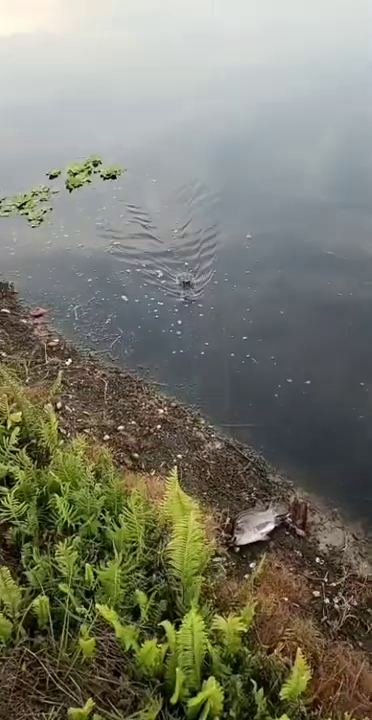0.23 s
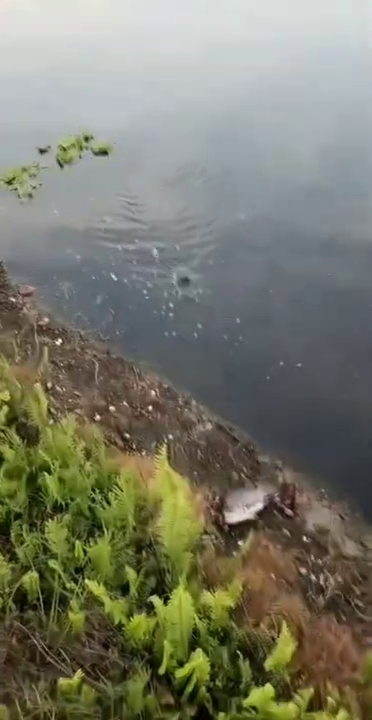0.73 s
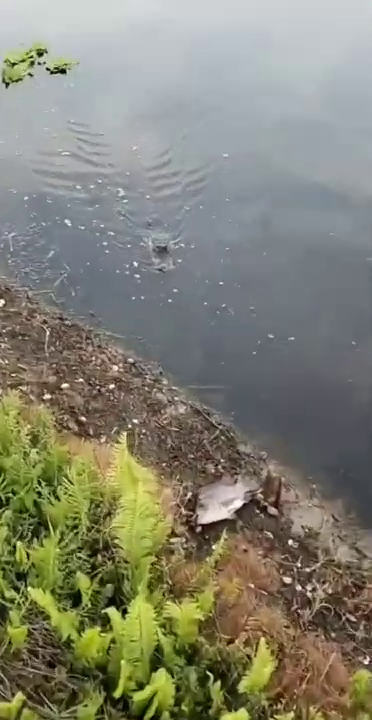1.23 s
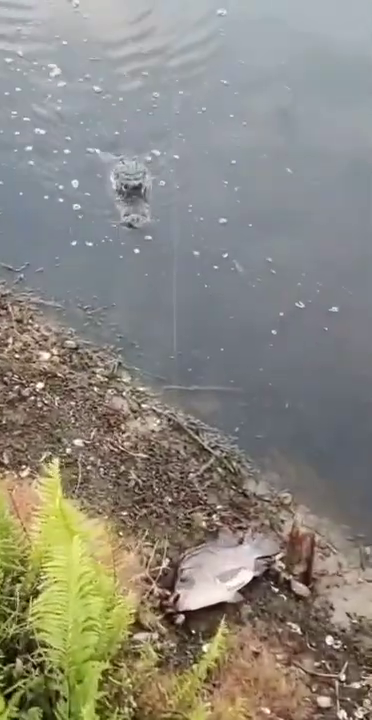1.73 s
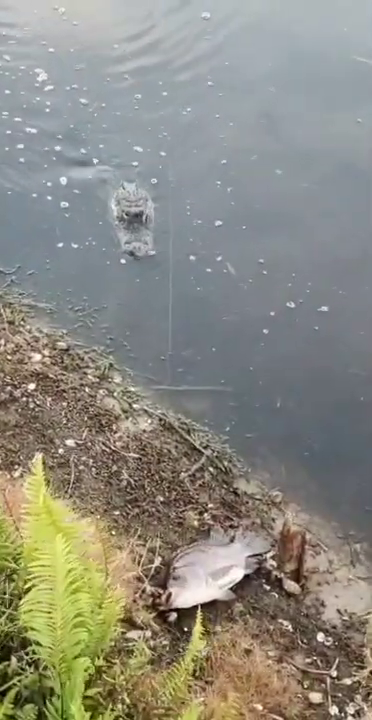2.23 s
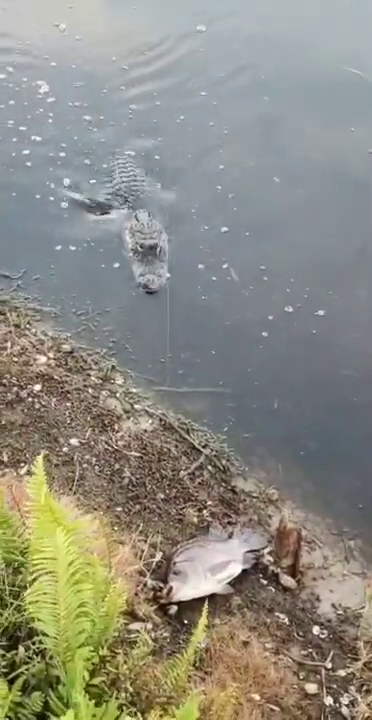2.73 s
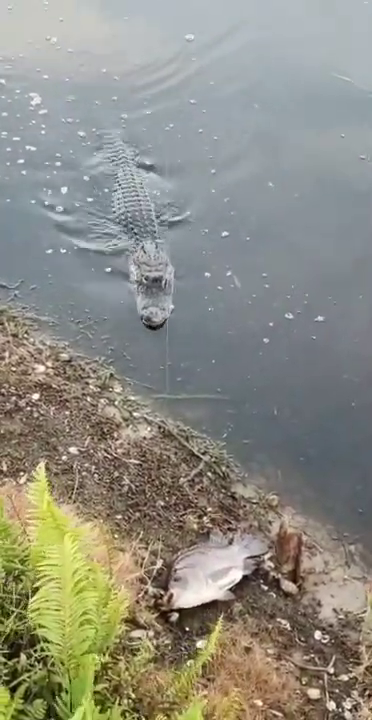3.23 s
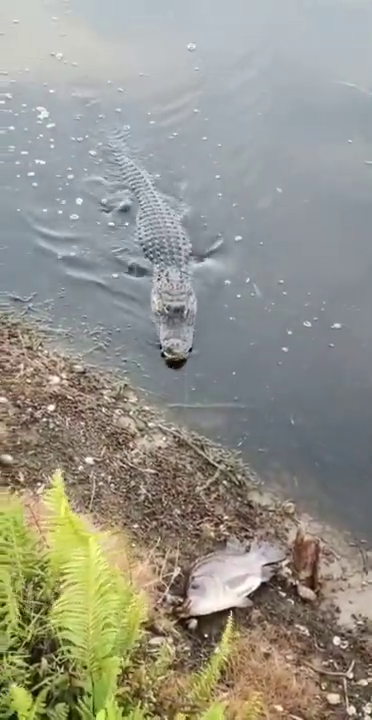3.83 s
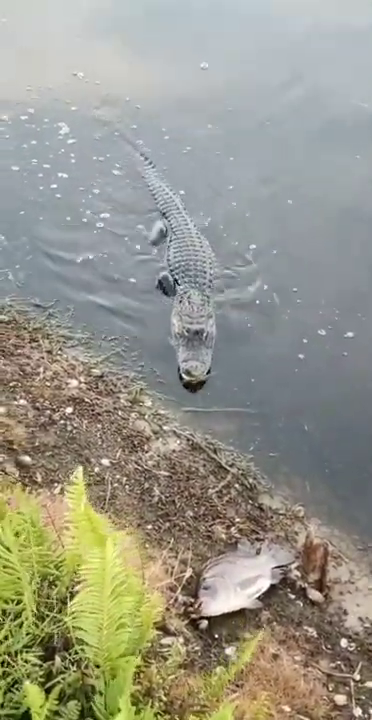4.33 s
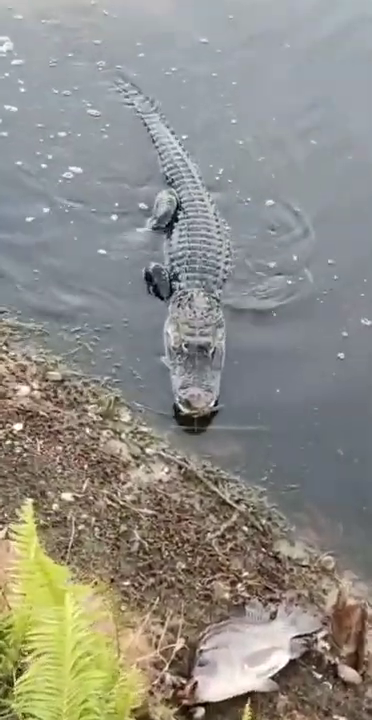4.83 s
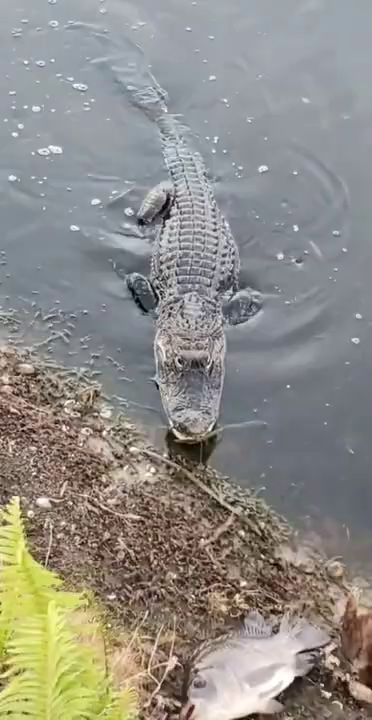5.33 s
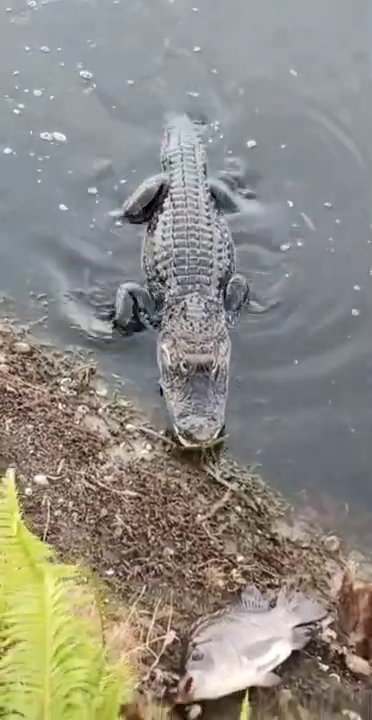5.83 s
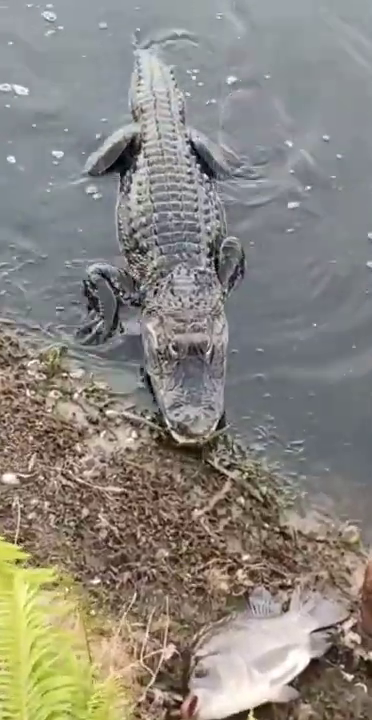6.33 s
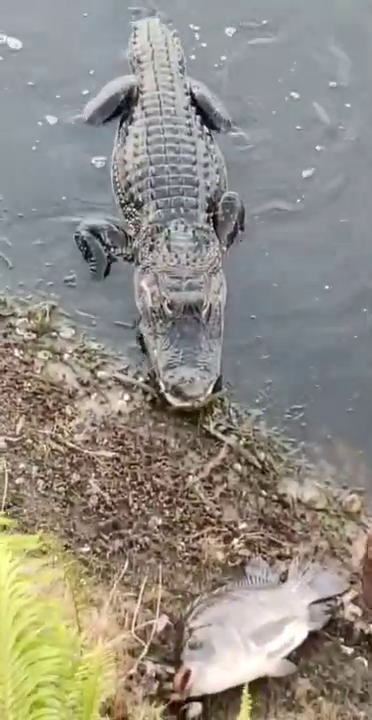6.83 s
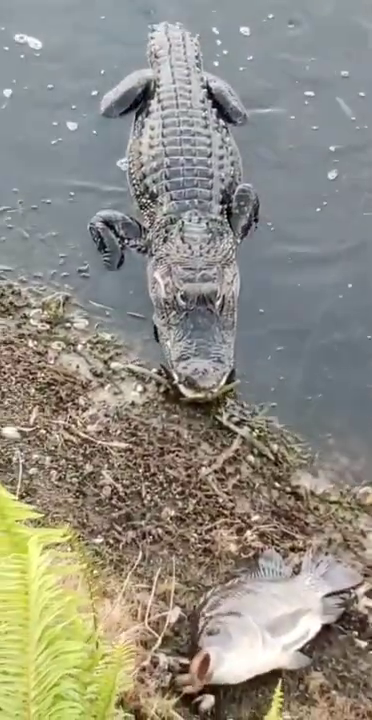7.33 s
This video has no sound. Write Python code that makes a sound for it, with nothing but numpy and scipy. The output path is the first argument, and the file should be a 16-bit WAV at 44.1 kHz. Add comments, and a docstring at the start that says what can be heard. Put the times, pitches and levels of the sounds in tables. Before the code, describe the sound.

Low, lumpy wind thumps on a bare microphone outdoors, hardest near four seconds, over faint high insect ticking, cicada shimmer and distant traffic.

```python
"""Wind, insects and far traffic

On a breezy day turbulent wind thumps low and lumpily on a bare microphone: shaken bands of noise and single eddies.
A stem cracks twice close by. Insects are clicks or pulsed noise ringing in resonances: two swelling cicadas, the
first ringing in other resonances in its second swell, a rattling buzzer and a ticking katydid over a steady chorus
of shaped noise. Crickets and birds are gliding sines. Far traffic is filtered noise with a band of tyre roar.
"""
import sys
import numpy as np
from scipy import signal
from scipy.fft import rfft, irfft, next_fast_len
from scipy.io import wavfile

SR = 44100
rng = np.random.default_rng(int(sys.argv[2]) if len(sys.argv) > 2 else 0)


def file_out(sig):
    """Save sig as 16-bit WAV at sys.argv[1]."""
    # one column per channel
    cols = np.atleast_2d(sig).T
    # limit, then scale
    lim = np.clip(cols, -1, 1)
    pcm = np.round(lim * 32767).astype(np.int16)
    wavfile.write(sys.argv[1], SR, pcm)


N = 333837


def from_db(db):
    """Amplitude gain from a level: 20 dB for each factor of ten."""
    return 10 ** (np.asarray(db) / 20)


def rms_one(x):
    """Normalise the mean power: the root mean square becomes 1."""
    return x / np.sqrt(np.mean(x ** 2) + 1e-20)


def in_time(rows):
    """Linear interpolation of a table's columns over time, its first column in seconds."""
    seconds, *columns = np.transpose(rows)
    return [np.interp(np.arange(N) / SR, seconds, column) for column in columns]


def at_hz(points, hz):
    """Spectrum level in dB, interpolated on a logarithmic frequency axis."""
    point_hz, point_db = np.transpose(points)
    return np.interp(np.log(hz), np.log(point_hz), point_db)


def drift(rate):
    """Low-pass random fluctuation: noise through two one-pole filters at rate (Hz), rms 1."""
    step = 20   # samples between computed values
    r = np.exp(-2 * np.pi * step * rate / SR)
    noise = rng.standard_normal(N // step + 2002)
    slow = signal.lfilter([1], [1, -2 * r, r * r], noise)[2000:]   # start-up discarded
    return np.interp(np.arange(N) / step, np.arange(len(slow)), rms_one(slow))


def coloured(spectrum, size=N):
    """Spectral shaping: white noise weighted in the frequency domain, rms 1."""
    room = next_fast_len(size)
    hz = np.maximum(np.arange(room // 2 + 1) * SR / room, 1)
    white = rfft(rng.standard_normal(room))
    return rms_one(irfft(white * from_db(at_hz(spectrum, hz)), room)[:size])


def body(x, modes):
    """Modal resonance: parallel two-pole resonators, each applied twice for steep skirts."""
    out = 0
    for hz, width, level_db in modes:
        r = np.exp(-np.pi * width / SR)
        b = (1 - r * r) / 2 * np.array([1, 0, -1])
        a = [1, -2 * r * np.cos(2 * np.pi * hz / SR), r * r]
        once = signal.lfilter(b, a, x + 1e-18)
        out = out + from_db(level_db) * signal.lfilter(b, a, once)
    return out


def add(track, s, piece):
    """Linear superposition: mix a piece into a track at a time in seconds."""
    i = round(s * SR)
    track[i:i + len(piece)] += piece[:N - i]


def wind(lumps_db, fast_db, own_db):
    """Turbulent pressure in half-octave bands; shared lumps shake them all, the high ones most."""
    # Each row: time in seconds, relative bass level in dB, upper-band level above the bass in dB.
    gusts = [(.24, -55, -18), (.46, -50.5, -14.5), (.53, -31, -24.5), (.95, -26, -22.5),
             (1.22, -25.5, -27.5), (1.3, -32.5, -28), (1.7, -31.5, -25.5), (2.05, -32, -23.5),
             (2.42, -41.5, -21), (2.8, -30, -28.5), (3.14, -36.5, -27), (3.46, -28.5, -20.5),
             (3.55, -36, -20.5), (3.64, -26, -19.5), (3.88, -27.5, -14), (4.06, -23, -15.5),
             (4.12, -29, -25), (4.24, -21.5, -22), (4.34, -35.5, -19.5), (4.5, -30, -22.5),
             (4.58, -35.5, -21.5), (4.9, -26.5, -22), (5.38, -30.5, -20), (5.5, -40.5, -21.5),
             (5.72, -32, -24), (6.0, -46, -21.5), (6.3, -39, -35.5), (6.7, -39, -22), (6.78, -51, -24),
             (6.87, -40, -26), (7.23, -33, -25), (7.31, -34.5, -23.5), (7.41, -24.5, -25.5),
             (7.48, -20.5, -17), (7.57, -26.5, -36)]
    # Each row: frequency in Hz, spectral weight in dB before the slope.
    base_spectrum = [(20, -19), (35, 6), (60, 5), (110, 2.5), (220, 0.5), (450, -10.5), (900, -18),
                     (1500, -25)]
    cap_db = 2.5   # limit of the extra lift that lumps give the upper bands, before its weight
    level_db, top_db = in_time(gusts)
    lumps = lumps_db * drift(18) + fast_db * drift(32)
    capped = np.where(lumps > 0, cap_db * np.tanh(lumps / cap_db), lumps)
    edges = 20 * 2 ** np.arange(0, 6.6, .5)
    white = rng.standard_normal((2, N))
    out = 0
    for k, (low, high) in enumerate(zip(edges, edges[1:])):
        band = signal.sosfilt(signal.butter(3, [low, high], "band", fs=SR, output="sos"), white[k % 2])
        hz = np.sqrt(low * high)
        # the fall of the spectrum grows with the octaves over the bass: 0 to 80 Hz, 1 at 300 Hz
        height = max(np.log(hz / 80), 0) / np.log(300 / 80)
        shake_db = 0.86 * lumps + 1.4 * height * capped + own_db * drift(11)
        out = out + band * from_db(at_hz(base_spectrum, hz) + height * top_db + shake_db)
    return signal.sosfilt(signal.butter(2, 900, fs=SR, output="sos"), out * from_db(level_db + 21.0))


def buffets():
    """Eddies burst as short pressure pulses, steep in spectrum; their bass starts earlier and lasts longer."""
    # Each row: time in seconds, relative level in dB, bass above that in dB, treble above that in dB.
    bursts = [(0.519, -37.5, 14.5, -30), (0.793, -35.5, 12, -31), (.935, -33, 11, -40),
              (1.014, -26, 8.5, -28), (1.057, -36.5, 14.5, -32.5), (1.581, -43, 22, -44),
              (1.77, -29, 10, -19), (1.825, -32, -1, -30), (2.031, -47.5, 22.5, -40), (2.483, -53, 22, -30),
              (2.758, -30, 14, -7.5), (3.27, -42.5, 21.5, -40), (3.321, -35.5, 12.5, -25),
              (3.385, -38, 22.5, -32), (3.462, -22.5, 4.5, -24.5), (3.484, -28, 3.5, -31),
              (3.501, -36, 12, -33), (3.611, -34.5, 13, -33.5), (3.635, -29, 8, -21), (3.76, -36, 13, -28),
              (3.786, -32, 11.5, -26), (3.801, -16, -5, -18), (3.847, -13.5, 0.5, -6), (3.864, -19, 2, -14),
              (3.883, -30, 4, -10), (3.904, -34, 3, -11.5), (3.924, -27, 7, -21.5), (3.933, -24.5, 4, -16),
              (3.957, -21, 7.5, -13), (3.983, -28, 4, -28.5), (4.006, -28, 7, -23), (4.021, -27.5, 5, -24),
              (4.045, -24, -2, -23.5), (4.152, -24, 11.5, -22), (4.2, -21.5, 7.5, -19),
              (4.216, -33, 8, -16), (4.286, -21, 6.5, -19), (4.385, -34.5, 12.5, -14),
              (4.505, -39.5, 16.5, -39), (4.73, -34.5, 13.5, -45), (4.795, -31, 9.5, -11.5),
              (4.81, -35.5, 7.5, -13.5), (4.818, -29, 10.5, -27.5), (4.887, -32.5, 16, -19),
              (4.926, -39, 22.5, -26), (4.962, -32.5, -5, -18.5), (5.03, -21, 0, -18),
              (5.089, -28, 13, -24.5), (5.117, -27, 3.5, -14), (5.203, -36.5, 11, -24),
              (5.218, -35.5, 11.5, -26.5), (5.289, -45, 15, -32), (5.342, -33, -8.5, -23),
              (5.356, -32.5, 5.5, -24), (5.655, -41.5, 20, -34), (5.863, -53, 25, -35),
              (6.088, -54.5, 25, -36), (6.179, -52.5, 23.5, -33), (6.23, -53, 24.5, -38),
              (6.265, -52.5, 25.5, -27), (6.448, -26, 4, -24), (6.857, -50, 18, -41),
              (7.007, -46, 16.5, -41), (7.164, -38.5, 17, -42.5), (7.237, -30, 10, -40.5),
              (7.338, -33, 16, -42.5), (7.387, -34, 11.5, -37.5), (7.441, -22.5, 4, -30),
              (7.45, -17, 4.5, -23), (7.469, -24.5, 9, -18.5), (7.487, -34, 12.5, -22),
              (7.498, -25, 13, -16), (7.503, -20.5, -6, -11), (7.518, -36, 13, -24)]
    out = np.zeros(N)
    sharp, slow = puff(0.003994, 0.00909), puff(0.01609, 0.02185)
    for s, peak_db, bass_db, treble_db in bursts:
        edge = [(120, -5), (260, 5.5), (500, -6.0), (1000, treble_db - 7.5),
                (1800, 2.0 * treble_db - 27.5), (3500, -89.5)]
        thump = [(25, -15.5), (55, 5.0), (130, 1.5), (250, -10), (600, -74.5)]
        sharp_part = eddy(edge, np.sqrt(sharp), churn=1.3, churn_hz=900)
        bass_part = eddy(thump, np.sqrt(slow), churn=0.8, churn_hz=300)
        add(out, s - .0005, from_db(peak_db - 5.0) * sharp_part)
        add(out, s - .012, from_db(peak_db + bass_db - 4.5) * bass_part)
    return signal.sosfilt(signal.butter(6, 2500, fs=SR, output="sos"), out + 1e-18)


def eddy(spectrum, shape, churn, churn_hz):
    """A coherent pressure pulse of random phase at the envelope's top, amid duller turbulent noise."""
    hz = np.maximum(np.arange(2049) * SR / 4096, 1)
    pulse = irfft(from_db(at_hz(spectrum, hz)) * np.exp(2j * np.pi * rng.random()))
    pulse = np.roll(pulse, np.argmax(shape))[:len(shape)]
    noise = coloured(spectrum, size=2 * len(shape))
    noise = signal.lfilter(*signal.butter(1, churn_hz, fs=SR), noise)[len(shape):]
    return even(even(pulse, shape) + churn * noise * shape, shape)


def even(burst, shape):
    """Energy equalisation: an enveloped burst gets the energy of steady unit noise under it."""
    return rms_one(burst * shape) * np.sqrt(np.mean(shape ** 2))


def puff(rise_s, fall_s):
    """Asymmetric transient envelope of height 1 from two raised-cosine halves."""
    up, down = np.hanning(2 * int(rise_s * SR)), np.hanning(2 * int(fall_s * SR))
    return np.r_[up[:len(up) // 2], down[len(down) // 2:]]


def snap():
    """Brittle fracture: a stem cracks twice close by, noise decaying exponentially with a weak tail."""
    # Each row: time in seconds, decay time in seconds, relative level in dB.
    cracks = [(2.2208, .0006, -38), (2.2255, .0016, -38.5)]
    burst = np.zeros(N)
    age = np.arange(4000) / SR
    for s, decay_s, level_db in cracks:
        add(burst, s, from_db(level_db) * (np.exp(-age / decay_s) + 0.1 * np.exp(-age / 0.019)))
    stem = [(4000, 2000, -22), (6800, 1500, -14), (11500, 3000, -3), (14000, 3500, 0)]   # Hz, width Hz, dB
    return body(burst * rng.standard_normal(N), stem)


def insects():
    """Stridulation and tymbal sound: a steady chorus, two swelling cicadas and a rattling buzzer."""
    # Each row: time in seconds, chorus level in dB.
    chorus_level = [(.24, -70), (1.5, -67), (2.3, -67.5), (4, -68), (5, -70.5), (5.6, -67), (6.5, -70.5),
                    (7.57, -68)]
    # Each row: frequency in Hz, spectral weight in dB.
    chorus_spectrum = [(3290, -39), (5600, -21.5), (6100, -21), (6290, -16), (6480, -5.5), (6970, 0),
                       (7440, -5.5), (7560, -17.5), (7830, -21.5), (9020, -24), (10200, -17), (10800, -4),
                       (12600, 2.5), (13700, 3.5), (15600, 0)]
    # Bouts of the first cicada (two swells), the second cicada and the buzzer.
    # Each row: start, rise, hold and fall in seconds, relative level in dB.
    first_swell, first_again = [(.22, 0.26, 0.44, 0.25, -67)], [(2.82, 0.4, 0.2, 0.22, -69.5)]
    second_bouts, rattle_bouts = [(.45, 0.44, 0.19, 0.11, -78), (1.32, 0.062, 0.22, 0.17, -85),
                                  (5.25, 0.093, .52, .14, -80)], [(1.35, .53, .03, .07, -83),
                                                    (2.25, .32, .03, .12, -86.5),
                                                    (2.97, .33, .03, .16, -82)]
    # Resonances of the first cicada in each of its swells, and of the second cicada.
    # Each row: frequency in Hz, width in Hz, level in dB, in places a glide in Hz per second.
    first_modes, again_modes, second_modes = [(4550, 650, -22), (6100, 550, -17), (6770, 790, -12),
                                              (11600, 750, -1), (13560, 700, 5, -750), (15000, 1000, -4.5)], [(4490, 600, -20), (6460, 500, -10.5),
                                                                (11500, 450, -2.5), (12100, 1200, -6),
                                                                (13170, 700, -3.5), (14200, 550, 0.5),
                                                                (15300, 700, -7)], [(5200, 2200, -21),
                                                                                  (9900, 1000, -9),
                                                                                  (10900, 1600, -6),
                                                                                  (12600, 1800, 0),
                                                                                  (13600, 1500, -4),
                                                                                  (14900, 1800, -5)]
    buzzer_hz, strokes_per_s = 7750, 150   # the stroke rate wanders about this mean
    chorus = from_db(in_time(chorus_level)[0] + 1.0 * drift(120)) * coloured(chorus_spectrum)
    stroke_rate = strokes_per_s * (1 + 0.074 * drift(5.1))
    strokes = np.sin(np.pi * np.cumsum(stroke_rate) / SR) ** 4
    buzz = rms_one(body(strokes * rng.standard_normal(N), [(buzzer_hz, 600, 0)]))
    first = cicada(first_swell, first_modes, level_db=9.0)
    first = first + cicada(first_again, again_modes, level_db=7.0)
    second = cicada(second_bouts, second_modes, level_db=12.5)
    return chorus + first + second + swells(rattle_bouts) * buzz


def cicada(bouts, modes, level_db):
    """Tymbal clicks excite resonances that wax and wane; the high ones stray in pitch as the body flexes."""
    wander_hz, strays_above_hz = 150, 11000
    start, rise, hold = bouts[0][:3]
    age = np.arange(N) / SR - start - rise - hold / 2   # from the middle of the first bout given
    out = 0
    for hz, width, mode_db, *glide in modes:
        ribs = clicks(8100, spread_db=4.5)   # each resonance has its own
        voice = from_db(2.3 * drift(5.1)) * body(ribs, [(hz, width, mode_db)])
        shift_hz = wander_hz * drift(1.5) + sum(glide) * np.clip(age, -1, 1)
        if hz > strays_above_hz:
            analytic = signal.hilbert(voice, next_fast_len(N))[:N]
            voice = (analytic * np.exp(2j * np.pi * np.cumsum(shift_hz) / SR)).real
        out = out + voice
    return swells(bouts) * from_db(level_db) * rms_one(out)


def clicks(per_s, spread_db):
    """A random impulse train: tymbal clicks of uneven size and either sign."""
    happens = rng.random(N) < per_s / SR
    return happens * from_db(spread_db * rng.standard_normal(N)) * rng.choice([-1, 1], N)


def swells(bouts):
    """Amplitude modulation by bouts: rise, hold and fall, with silence between."""
    t, gain = np.arange(N) / SR, 0
    for s, rise, hold, fall, db in bouts:
        gain = gain + from_db(db) * np.interp(t - s, np.cumsum([0, rise, hold, fall]), [0, 1, 1, 0])
    return gain


def katydid():
    """Wing stridulation: 2.5 ms ticks about 42 times a second, each after a weak back stroke, excite resonances."""
    # Each row: start in seconds, number of ticks, first gap in seconds.
    tick_bouts = [(.3093, 85, .023175), (4.6584, 86, .02298)]
    # One value per bout: relative level in dB.
    bout_db = [-44, -44]
    # One value per bout: weakening in dB, times the squared distance from the loudest tick in half bouts.
    bout_fade_db = [2.7, 5]
    # Each row: resonance in Hz, width in Hz, level in dB.
    wing_modes = [(13600, 1200, 0), (15000, 1500, -7), (12300, 900, -9)]
    gap_growth_s = 1.1e-5   # each gap is this much longer than the last
    strokes = np.zeros(N)
    for (s, ticks, gap), level_db, fade_db in zip(tick_bouts, bout_db, bout_fade_db):
        number = np.arange(ticks)
        times = s + gap * number + gap_growth_s * number ** 2 / 2
        for at, place in zip(times, 2 * number / ticks - 1):
            size_db = level_db - fade_db * (place - .25) ** 2 + 1.2 * rng.standard_normal()
            add(strokes, at - .0008, from_db(size_db) * np.hanning(110))
            add(strokes, at - .0075, from_db(size_db - 13.0) * np.hanning(200))   # back stroke
    wing = body(strokes * rng.choice([-1, 1], N), wing_modes)
    return signal.sosfilt(signal.butter(4, 11500, "high", fs=SR, output="sos"), wing)


def whistles():
    """Frequency-modulated sines: sagging cricket chirps and gliding bird notes, fluttering with distance."""
    # Each row: start in seconds, chirps, gap in seconds, pitch in Hz, chirp length in seconds.
    cricket_bouts = [(2.545, 4, .079, 4490, .042), (5.025, 8, .0905, 4620, .017)]
    # Each row: start in seconds, length in seconds, start, middle and end pitch in Hz, level in dB before flutter.
    bird_notes = [(.645, .035, 4800, 4500, 4200, -80), (2.651, 0.038, 5100, 5700, 5250, -83),
                  (5.18, 0.045, 5600, 5950, 5650, -80), (5.565, .07, 2900, 2740, 2650, -85),
                  (5.785, .08, 6300, 4700, 3700, -88.5), (5.85, 0.061, 2300, 2070, 1900, -87),
                  (6.12, 0.12, 2480, 2340, 2120, -82), (6.18, .07, 3100, 2300, 1900, -88),
                  (6.375, .085, 5700, 4300, 3400, -92), (6.51, 0.075, 3200, 2250, 1800, -89),
                  (6.685, .1, 2480, 2280, 2200, -84), (6.81, 0.065, 3800, 2950, 2150, -91),
                  (6.865, .05, 2200, 2000, 1850, -85), (6.93, .1, 5700, 4200, 3500, -97),
                  (7.13, .1, 3800, 2500, 1850, -92)]
    cricket_db, uneven_db = -87, 2.5   # mean and spread, before flutter
    sag = .008   # share of pitch lost in half a chirp
    notes = list(bird_notes)
    for s, chirps, gap, tone, length in cricket_bouts:
        for k in range(chirps):
            chirp_db = rng.normal(cricket_db, uneven_db)
            notes.append((s + gap * k, length, (1 + sag) * tone, tone, (1 - sag) * tone, chirp_db))
    out = np.zeros(N)
    for s, length, start_hz, middle_hz, end_hz, peak_db in notes:
        part = np.linspace(0, 1, max(int(length * SR), 50))
        hz = np.polyval(np.polyfit([0, .5, 1], [start_hz, middle_hz, end_hz], 2), part)
        envelope = np.sqrt(np.abs(np.sin(np.pi * part)))
        add(out, s, from_db(peak_db) * envelope * np.sin(2 * np.pi * np.cumsum(hz) / SR))
    return out * from_db(3.5 * drift(60))


def twitter(notes, level_db):
    """Random superposition of far small birds: short falling sines, thickest late in the scene."""
    out = np.zeros(N)
    for when, pitch, fall, long, loud in rng.random((notes, 5)):
        part = np.linspace(0, 1, int((.012 + .02 * long) * SR))
        hz = (5700 - 2900 * pitch ** 4) * (1 - (.05 + .2 * fall) * part)
        note = np.sin(np.pi * part) * np.sin(2 * np.pi * np.cumsum(hz) / SR)
        add(out, 6.72 - 3.2 * when ** 1.3, from_db(level_db + 9 * loud) * note)
    return out


def traffic():
    """Many far sources merge into steady noise; narrow noise on a moving carrier is the tyre roar."""
    # Each row: time in seconds, rumble level in dB, tyre roar level in dB, centre of the roar in Hz.
    course = [(.24, -57.5, -79, 790), (1.0, -56, -85, 804.3), (1.7, -59, -73.5, 845), (2.4, -58, -70, 915),
              (3.0, -58.5, -69.5, 899), (3.7, -61, -74, 900), (4.5, -63, -82, 841), (7.57, -64, -89, 816)]
    # Each row: frequency in Hz, spectral weight in dB.
    rumble_spectrum = [(130, -16.5), (270, 3.5), (400, -15.5), (620, -17.5), (900, -25), (1250, -28),
                       (1800, -37), (2200, -41), (3500, -42), (5500, -47), (7000, -71.5)]
    rumble_db, roar_db, roar_hz = in_time(course)
    low_noise = signal.sosfilt(signal.butter(2, 80, fs=SR, output="sos"), rng.standard_normal((2, N)))
    phase = 2 * np.pi * np.cumsum(roar_hz) / SR
    roar = rms_one(low_noise[0] * np.cos(phase) + low_noise[1] * np.sin(phase))
    rumble = from_db(rumble_db + 0.35 * drift(5)) * coloured(rumble_spectrum)
    return rumble + from_db(roar_db) * roar


def scene():
    """Superposition of all sources at one microphone, the wind alone saturating."""
    air = wind(lumps_db=1.33, fast_db=2.5, own_db=2.5) + buffets()
    air = .45 * np.tanh(air / .45)   # the hardest gusts drive the diaphragm towards its limit
    near = air + snap()
    singers = insects() + katydid() + whistles() + twitter(notes=300, level_db=-98.5)
    return (near + singers + traffic())[None]


def record(dry):
    """Band limiting: the sound opens after a moment of silence; deepest bass and the top are cut."""
    start_s, opening_s, cutoff_hz = 0.2396, 0.0055, 15790
    opened = dry * np.clip((np.arange(N) / SR - start_s) / opening_s, 0, 1)
    opened = signal.sosfilt(signal.butter(2, 32, "high", fs=SR, output="sos"), opened)
    return signal.sosfilt(signal.ellip(12, .5, 70, cutoff_hz, fs=SR, output="sos"), opened)


dry = scene()
out = record(dry)
file_out(out)
```